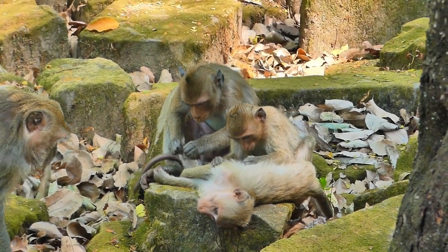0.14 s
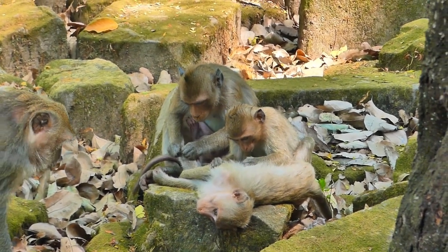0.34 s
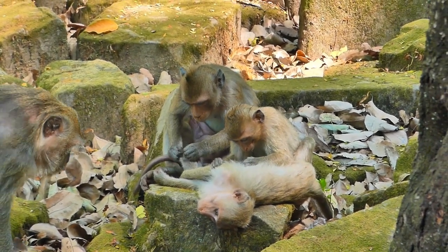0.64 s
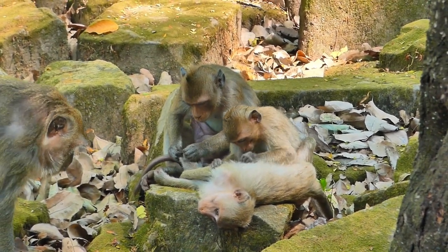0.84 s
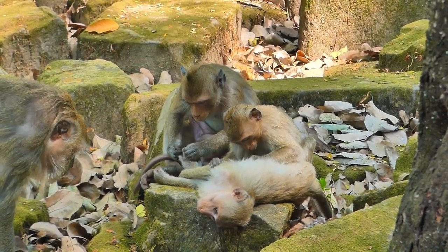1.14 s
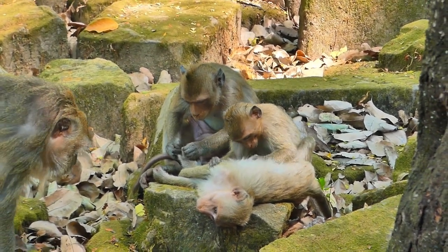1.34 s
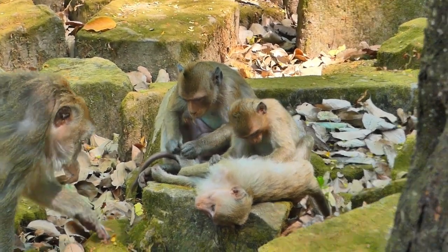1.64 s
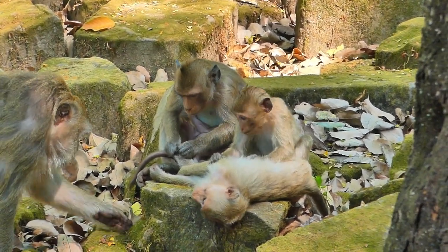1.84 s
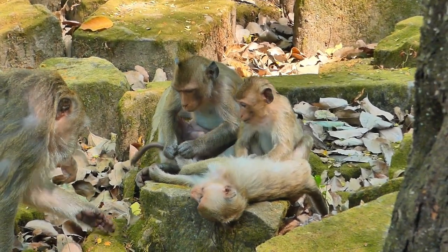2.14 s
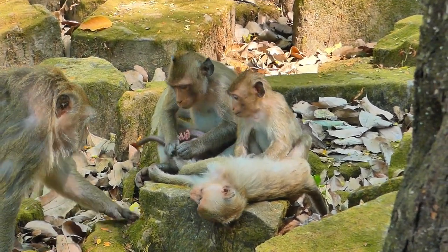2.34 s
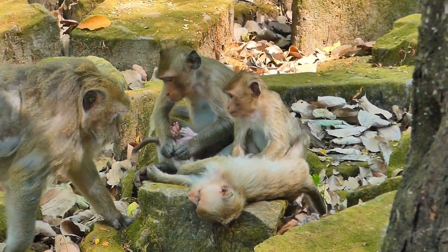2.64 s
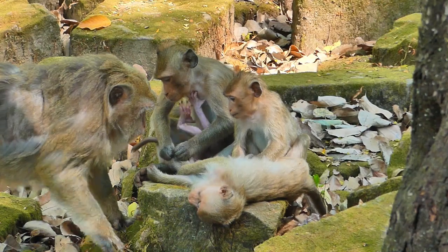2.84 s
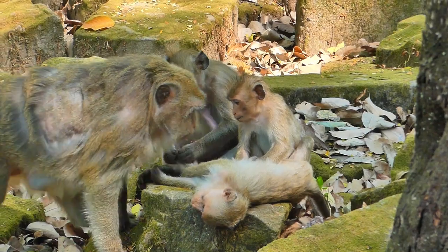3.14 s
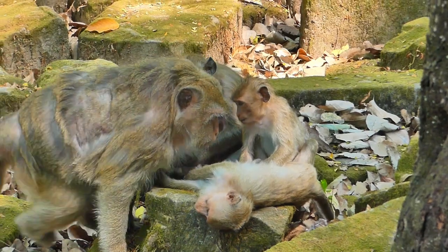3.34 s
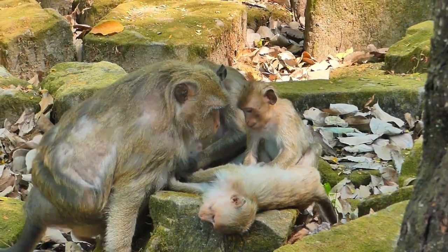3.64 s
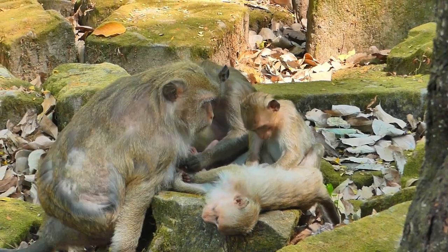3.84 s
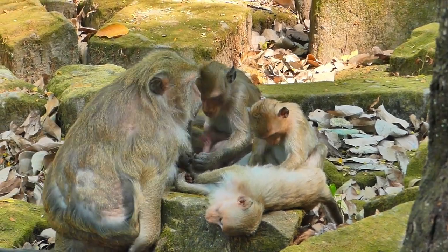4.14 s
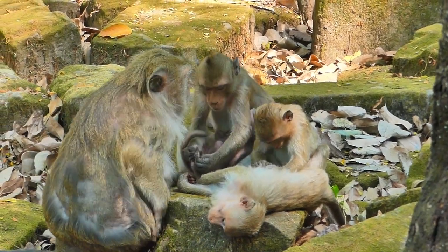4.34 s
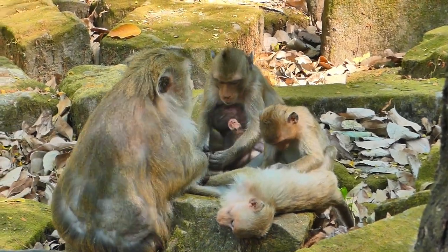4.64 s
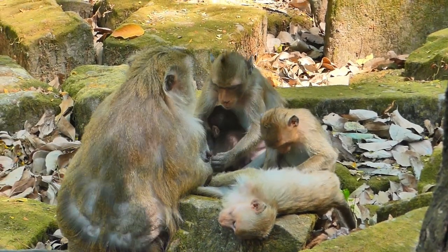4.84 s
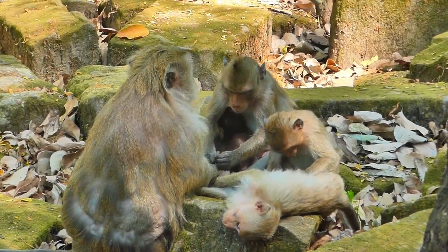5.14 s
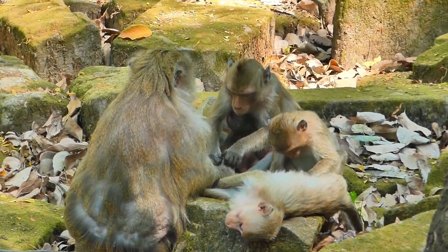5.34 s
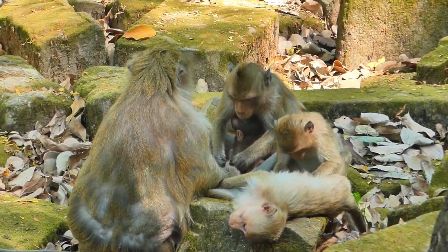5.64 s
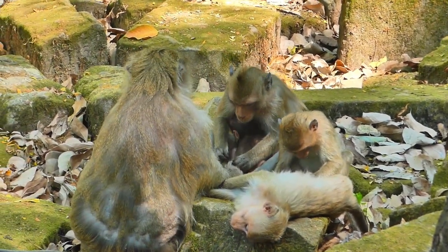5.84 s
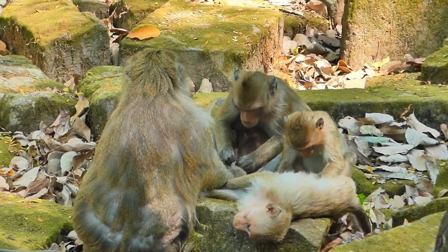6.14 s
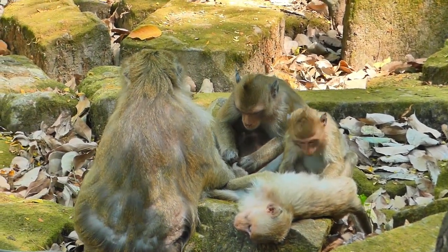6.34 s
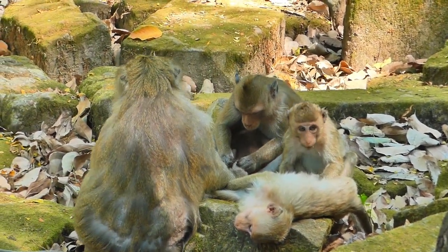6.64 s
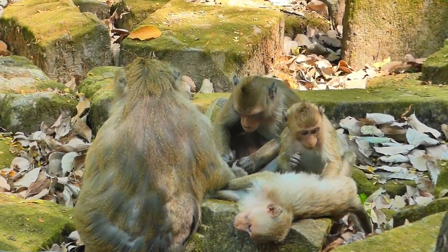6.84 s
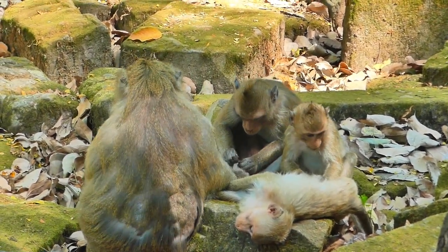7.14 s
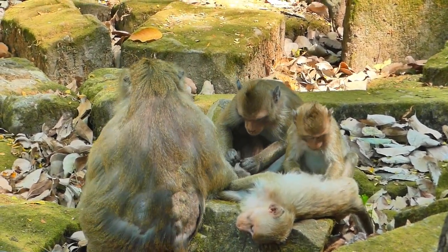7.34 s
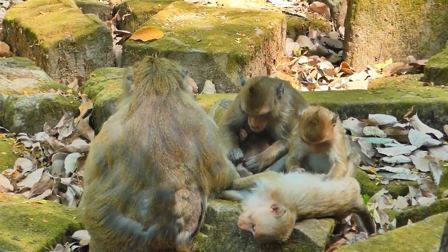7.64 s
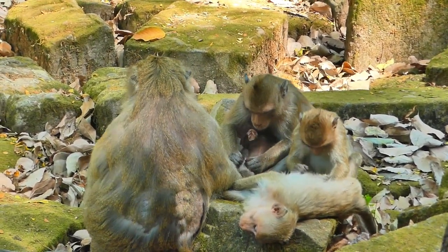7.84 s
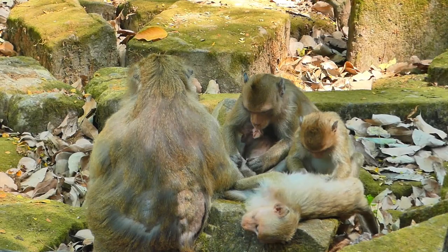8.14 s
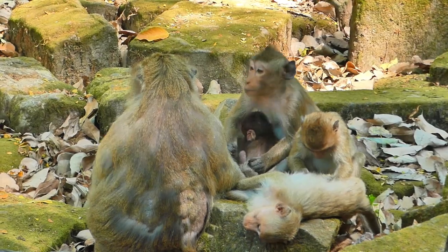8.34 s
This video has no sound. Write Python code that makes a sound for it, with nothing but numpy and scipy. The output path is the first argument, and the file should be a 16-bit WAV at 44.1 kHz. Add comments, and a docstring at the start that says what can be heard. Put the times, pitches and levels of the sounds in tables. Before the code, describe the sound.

A young macaque gives two clear, arched coos, then strained high squeals and rasping shrieks, with faint taps and dry leaf rustles in a quiet forest.

```python
"""Stone ruins in a forest: a baby macaque gives two clear, arched coos, then short yelps, squeals and rasping shrieks.
Coos and yelps are near-pure harmonics shaped by the mouth; a squeal is a high, unsteady whistle that frays into noise,
over a throat rasp and a hiss at the teeth. Hands and feet tap and thump as damped rings; dry leaves crack and scrape.
Thin gliding whistles sound far off, scattered noise echoes return from trunks and walls, and shaped noise is the air."""
import sys
import numpy as np
from scipy import signal
from scipy.fft import rfft, irfft, next_fast_len
from scipy.io import wavfile

SR = 44100
rng = np.random.default_rng(int(sys.argv[2]) if len(sys.argv) > 2 else 0)


def generate_wav(signal):
    """Clip the signal to [-1, 1] and save it as 16-bit WAV at the path in sys.argv[1]."""
    frames = np.transpose(np.atleast_2d(signal))
    scaled = np.clip(frames, -1, 1) * 32767
    pcm = np.round(scaled).astype(np.int16)
    wavfile.write(sys.argv[1], SR, pcm)


N = 374850  # samples

# Pitch and level arches of the coos, a list per coo.
# Each row: time in seconds, pitch in Hz, fundamental level in dB, second harmonic level in dB.
COO_CONTOURS = [
    [(0.893, 1470, -46, -74), (0.911, 1410, -41.5, -61), (0.935, 1540, -34, -74), (1.005, 1712, -35.5, -70),
     (1.127, 1845, -50, -54.5), (1.227, 1848, -42.5, -40.5), (1.293, 1778, -35, -40),
     (1.325, 1653, -30.5, -55.5), (1.35, 1490, -38, -71)],
    [(1.535, 1368, -47, -57), (1.555, 1471, -43.5, -55), (1.577, 1540, -32, -58.5),
     (1.651, 1653, -29, -62.5), (1.705, 1770, -34.5, -40.5), (1.799, 1815, -40, -40),
     (1.831, 1732, -34, -41.5), (1.863, 1637, -33, -55.5), (1.875, 1640, -52, -66)],
]
# High overtones against the second harmonic. Each entry: level of one coo in dB.
COO_BRIGHT_DB = [-6.5, -4]


def coo(contour, bright_db):
    """One clear arch: the fundamental thins and flutters where the mouth opens and the second harmonic swells."""
    start_s, end_s = contour[0][0], contour[-1][0]
    t = start_s + seconds(end_s - start_s)
    hz, first_db, second_db = follow(contour, t)
    waver = noise(len(t), 31, 31, order=4)
    mouth = amp((second_db - second_db.max()) / 2)
    wavering_hz = hz * (1 + .006 * mouth * waver)
    thinned_db = first_db - 2 * mouth * waver
    return start_s, voice(wavering_hz, thinned_db, second_db, bright_db, jitter=.003, shimmer=.035)


# Response of the mouth to overtones, read against the second harmonic. Each row: frequency in Hz, gain in dB.
MOUTH_RESPONSE = [(3150, -7.5), (3570, 2), (4400, -14), (5300, -21), (7200, -29.5), (10500, -18),
                  (14500, -31)]


def voice(hz, first_db, second_db, bright_db, jitter, shimmer):
    """A near-pure voice whose overtones pass the mouth."""
    n = len(hz)
    phase = phase_of(hz * (1 + jitter * noise(n, 0, 160)))
    overtones = np.zeros(n)
    for k in range(2, 9):
        level_db = read(MOUTH_RESPONSE, k * hz) - read(MOUTH_RESPONSE, 2 * hz)
        if k > 2:
            level_db = level_db + bright_db + 3.2 * noise(n, 18, 50, order=4)
        level_db = level_db + 2 * noise(n, 0, 130)
        overtones += amp(level_db) * np.sin(k * phase)
    tone = amp(first_db) * np.sin(phase) + amp(second_db) * overtones
    edges = signal.windows.tukey(n, .05)
    return np.sqrt(2) * edges * tone * (1 + shimmer * noise(n, 0, 330))


# Contours of the squeal whistles, a list per squeal. Each row: time in seconds, centre pitch in Hz, mean level in dB.
SQUEAL_CONTOURS = [
    [(4.247, 9740, -27), (4.266, 10550, -39.5), (4.311, 11320, -43.5), (4.332, 12300, -56),
     (4.494, 11770, -40.5), (4.515, 10660, -34.5), (4.558, 11160, -58), (4.608, 10830, -37),
     (4.632, 11800, -51), (4.652, 10860, -41.5), (4.725, 11460, -53), (4.745, 11580, -33.5),
     (4.777, 11240, -48), (4.812, 10110, -38.5), (4.855, 11420, -49), (4.91, 11520, -49.5),
     (4.926, 10500, -39), (4.947, 10420, -43)],
    [(5.237, 8220, -47), (5.255, 9500, -39), (5.323, 12460, -46), (5.355, 11390, -43.5),
     (5.437, 12150, -42), (5.475, 12250, -29.5), (5.496, 11220, -39), (5.515, 12430, -38),
     (5.54, 9500, -28.5), (5.553, 11150, -27.5), (5.603, 9780, -31), (5.668, 10210, -30),
     (5.693, 9300, -45), (5.722, 5830, -39.5)],
    [(5.982, 3607, -38.5), (6.004, 4000, -37.5), (6.024, 4600, -69), (6.034, 5746, -42.5),
     (6.066, 5986, -44), (6.112, 5650, -52), (6.15, 6175, -45), (6.175, 4196, -51), (6.205, 3684, -48)],
    [(6.41, 3595, -40), (6.423, 4154, -39), (6.46, 5520, -43), (6.477, 7380, -54), (6.506, 8900, -49),
     (6.585, 9470, -47.5), (6.625, 8670, -44)],
    [(6.852, 3150, -56.5), (6.871, 4180, -48.5)],
    [(6.924, 7550, -55), (6.975, 8400, -48.5), (7.0, 9420, -45), (7.066, 10560, -47), (7.142, 10600, -47.5),
     (7.164, 10040, -43), (7.237, 9880, -45), (7.248, 6710, -49.5), (7.266, 6030, -45.5)],
    [(7.465, 2400, -60), (7.487, 3430, -46.5), (7.508, 4415, -64), (7.527, 5880, -43), (7.56, 6200, -50.5),
     (7.575, 8880, -45.5), (7.612, 8100, -49), (7.645, 10160, -41.5), (7.664, 9400, -29.5)],
    [(7.688, 10010, -23.5), (7.708, 10490, -39.5), (7.742, 10020, -25.5), (7.762, 10120, -41),
     (7.787, 10700, -33), (7.806, 9670, -42), (7.826, 10100, -31.5), (7.86, 10240, -45), (7.876, 8740, -33),
     (7.91, 7980, -46), (7.932, 5890, -41.5)],
    [(8.19, 9980, -45), (8.226, 10630, -37), (8.283, 10370, -46.5), (8.355, 10740, -42),
     (8.377, 10540, -36), (8.43, 10890, -33.5), (8.475, 10180, -39), (8.52, 10720, -34)],
]
# Strain, a list per squeal. Each row: time in seconds, roughness before its fits (held to 0-1),
# throat rasp level in dB, hiss level in dB.
SQUEAL_STRAIN = [
    [(4.247, 0, -71, -52), (4.42, .03, -64, -59), (4.46, .1, -56, -57), (4.76, 0.13, -60.5, -49.5),
     (4.8, 0, -69, -56), (4.947, 0.3, -60, -52)],
    [(5.237, 0.1, -68, -58), (5.36, 0.4, -59.5, -52), (5.42, 0.78, -57.5, -42), (5.47, .05, -72, -54),
     (5.535, 0.66, -51, -50), (5.56, 0.1, -60, -56), (5.605, 0.12, -61, -54), (5.655, .03, -65, -47),
     (5.722, .8, -49, -48)],
    [(5.982, 0.13, -51, -39), (6.022, 0.17, -55.5, -56), (6.06, 0.2, -52.5, -41), (6.115, 0.4, -54, -53),
     (6.16, 0.46, -43, -49.5), (6.205, 1.1, -46, -57)],
    [(6.42, 0.15, -42.5, -42), (6.455, 0.33, -45, -49), (6.5, 0.5, -56, -51), (6.6, 1.1, -49, -47.5)],
    [(6.852, .4, -58.5, -69)],
    [(6.924, 0.2, -65.5, -64), (7.1, 0.24, -61, -53), (7.266, 0.9, -56.5, -58)],
    [(7.465, .3, -56, -67), (7.55, 0.3, -54.5, -50), (7.59, .02, -62.5, -68), (7.665, .1, -60, -41)],
    [(7.688, .03, -57.5, -43), (7.77, 0.02, -57, -47.5), (7.932, 0.34, -60, -54)],
    [(8.19, 0.56, -48, -35), (8.27, 0, -54, -50), (8.44, 0.05, -53, -41.5)],
]
# Two throat resonances. Each row, one per squeal: lower in Hz, upper in Hz, lower against upper in dB.
THROAT_RESONANCES = [(3200, 6120, -10.5), (4050, 6360, -2.5), (4200, 5500, -4), (4970, 6000, -10),
                     (3400, 4000, 0), (3900, 6900, -5), (3300, 6000, -6), (3280, 5860, -7.5),
                     (3200, 5570, -13)]
# Spectrum of the hiss at the teeth. Each row: frequency in Hz, gain in dB.
TEETH_SPECTRUM = [(7000, -54), (8300, -17), (10000, -7), (12800, -3), (15800, -7)]
LOWER_WIDTH_HZ, UPPER_WIDTH_HZ = 1800, 1900
WARBLE_HZ, WARBLE_PER_S, QUAVER_HZ = 79.1, 27, 80.8  # rms pitch swings, warble centre rate
CRACK_DB, SPUTTER_DB = 3, 0.7  # rms swings of roughness and of harsh level
RASP_ATTACK_S, RASP_RELEASE_S = .03, .015


def squeal(contour, strain, throat):
    """A high, unsteady whistle that frays in fits, over a rasp in the throat and a hiss at the teeth."""
    start_s, end_s = contour[0][0], contour[-1][0]
    t = start_s + seconds(end_s - start_s)
    n = len(t)
    hz, db = follow(contour, t)
    rough, rasp_db, hiss_db = follow(strain, t)
    lower_hz, upper_hz, lower_db = throat
    warble, shake_db, crack, sputter = [noise(n, WARBLE_PER_S, 40, order=4) for _ in range(4)]
    rough = np.clip(rough * amp(CRACK_DB * crack), 0, 1)
    hz = hz + WARBLE_HZ * warble
    phase = phase_of(hz + QUAVER_HZ * noise(n, 0, 300, order=4))

    # The drive builds up after the whistle starts and fades before it stops.
    edges = np.minimum((t - start_s) / RASP_ATTACK_S, (end_s - t) / RASP_RELEASE_S)
    drive = rattle(hz, phase, rough) * np.clip(edges, 0, 1)
    upper = resonate(drive, upper_hz, UPPER_WIDTH_HZ)
    lower = resonate(drive, lower_hz, LOWER_WIDTH_HZ)
    rasp = unit(upper + amp(lower_db) * lower)
    hiss = coloured(drive, TEETH_SPECTRUM)
    harsh = amp(SPUTTER_DB * sputter) * (amp(rasp_db) * rasp + amp(hiss_db) * hiss)
    tone = amp(db + shake_db) * whistle(phase, rough)
    return start_s, gate(n) * (tone + undertones(t, phase) + harsh)


FRAY_HZ = 1710  # width of the noise around a rough whistle
FLUTTER_DB = 3  # rms


def whistle(phase, rough):
    """Roughness turns a share of the tone into noise around its pitch; the folds limit its swing."""
    n = len(phase)
    clear = unit(amp(FLUTTER_DB * noise(n, 0, 700, order=4)))
    frayed = unit(noise(n, 0, FRAY_HZ, order=3) + 1j * noise(n, 0, FRAY_HZ, order=3))
    swing = np.sqrt(1 - rough) * clear + np.sqrt(rough) * frayed
    limited = swing / np.sqrt(1 + abs(swing) ** 2)
    return unit((limited * np.exp(1j * phase)).imag)


# Clear tones below a whistle. Each row: start in seconds, length in seconds, share of the whistle pitch, level in dB.
UNDERTONE_SPELLS = [(4.81, 0.044, 0.49, -54), (5.593, 0.15, .71, -49.5), (6.035, 0.2, 0.8, -55),
                    (7.72, 0.13, 0.845, -50), (8.233, 0.077, 0.51, -48)]


def undertones(t, phase):
    """For short spells the folds lock, and a clear tone below the whistle follows its pitch."""
    flutter = unit(amp(5 * noise(len(t), 0, 400, order=4)))
    tones = np.zeros(len(t))
    for start_s, length_s, share, db in UNDERTONE_SPELLS:
        position = 2 * (t - start_s) / length_s - 1  # -1 to 1 within the spell
        swell = np.sqrt(2 * np.maximum(1 - position ** 2, 0))
        tones += amp(db) * swell * np.sin(share * phase)
    return flutter * tones


FLAP_LOW_HZ, FLAP_HIGH_HZ = 1400, 3000  # sought flapping rates; the low one also floors the side tones
LOCK_S = .025  # mean hold of one sought rate


def rattle(hz, phase, rough):
    """The flapping folds spread wobbling side tones around the whistle; turbulent air joins them."""
    n, flap_hz = len(hz), flapping(hz)
    flap_phase = phase_of(flap_hz)
    tones = np.zeros(n)
    for k in np.r_[-5:0, 1:8]:
        wobble = (.85 + .9 * rough) * noise(n, 0, 850, order=4)
        side_hz = hz + k * flap_hz
        audible = (side_hz > FLAP_LOW_HZ) * (side_hz < SR / 2)
        tones += audible * np.sin(phase + k * flap_phase + wobble) * amp(4.5 * noise(n, 0, 110, order=4))
    return unit(tones) + (.5 + .7 * rough) * rng.standard_normal(n)


def flapping(hz):
    """The folds lock to a half, a third, a quarter... of the pitch, with sudden jumps."""
    spell = np.cumsum(rng.random(len(hz)) < 1 / (LOCK_S * SR))
    spell_start = np.searchsorted(spell, spell)
    wanted_hz = rng.uniform(FLAP_LOW_HZ, FLAP_HIGH_HZ, len(hz))[spell_start]
    return hz / np.maximum(np.round(hz / wanted_hz), 2)


# Short rising yelps. Each row: start in seconds, length in seconds, first pitch in Hz, last pitch in Hz,
# fundamental mid level in dB, second harmonic mid level in dB.
YELP_GLIDES = [(5.955, .027, 1720, 2255, -56.5, -53.5), (6.384, 0.023, 1900, 2433, -51.5, -57),
               (6.829, .028, 1860, 2345, -60, -59.5)]


def yelp(start_s, length_s, first_hz, last_hz, first_db, second_db, swell_db=6):
    """A short upward glide of the coo's voice, growing louder."""
    u = seconds(length_s) / length_s
    hz = first_hz + (last_hz - first_hz) * u
    swell = swell_db * (u - .5)
    return start_s, voice(hz, first_db + swell, second_db + swell, bright_db=-10, jitter=.04, shimmer=.4)


# Soft contacts of hands and feet on stone. Each row: start in seconds, relative level in dB, ring in Hz.
STONE_THUMPS = [(1.312, -40.5, 766), (1.388, -40.5, 635), (1.408, -46, 560)]
THUMP_T60_S, THUMP_LOW_HZ = 0.047, 238


def thump(start_s, db, hz):
    """A soft, heavy contact on stone: a few dying cycles over a low push."""
    t = seconds(THUMP_T60_S)
    ring = np.sin(2 * np.pi * hz * t)
    push = .5 * np.sin(2 * np.pi * THUMP_LOW_HZ * t)
    body = ring + push + 0.61 * noise(len(t), hz, hz)
    return start_s, amp(db - 60 * t / THUMP_T60_S) * gate(len(t)) * body


# Taps on stone and snaps of leaves. Each row: start in seconds, relative level in dB, ring in Hz, T60 in seconds.
STONE_TAPS = [(1.397, -35.5, 4000, 0.0057), (1.92, -39, 931, 0.016), (2.787, -47.5, 725, 0.058),
              (3.077, -49, 2850, 0.053), (3.382, -48, 855, 0.052), (3.93, -44.5, 2400, 0.069),
              (4.127, -49.5, 4640, 0.15), (4.153, -49, 5900, 0.069), (6.199, -44.5, 930, 0.03),
              (7.97, -35.5, 880, 0.028), (8.233, -37.5, 686, 0.055)]


def tap(start_s, db, hz, t60_s):
    """A short, damped knock; the leaves under it crackle as they give way."""
    t = np.arange(SR // 6) / SR
    attack = 1 - np.exp(-t / 0.00044)
    body = noise(len(t), hz, .8 * hz, order=4) * attack * amp(-60 * t / t60_s)
    cracks = rng.standard_normal(len(t)) * (.3 + (rng.random(len(t)) < 2000 / SR))
    crackle = coloured(cracks, [(400, -10), (2000, 0), (7000, -9), (12000, -24)])  # (Hz, dB)
    crackle = crackle * amp(-60 * (t / t60_s) ** 1.5)
    return start_s, amp(db - 1) * (body + 0.34 * crackle)


# Pushes of a body through leaves. Each row: peak time in seconds, relative peak level in dB,
# swell in seconds, fade in seconds.
LEAF_SHUFFLES = [(5.73, -58, 0.81, 0.84), (6.19, -61, 0.55, 1), (7.925, -41, 0.087, 0.12),
                 (7.973, -46, 0.03, 0.041), (8.058, -39, 0.044, 0.091), (8.135, -43.5, 0.054, 0.13),
                 (8.235, -44.5, 0.21, 0.12), (8.48, -51, 0.48, 0.62)]
# Light brushes over leaves. Each row: peak time in seconds, relative peak level in dB,
# swell in seconds, fade in seconds.
LEAF_BRUSHES = [(0.961, -46, 0.052, 0.071), (1.25, -54.5, 0.94, 0.17), (7.5, -58.5, .8, 0.38)]
# Spectrum of the pushed leaves. Each row: frequency in Hz, gain in dB.
LEAF_SPECTRUM = [(40, -33), (120, -14.5), (580, 3), (2300, 0), (3700, -4), (6000, -2), (15000, -15)]
STIR_RANGE_DB = 20  # rise over the swell, drop over the fade


def rustle(peak_s, peak_db, swell_s, fade_s, spectrum, cracks_per_s, spread_db):
    """Dry leaves: a dense run of tiny cracks of uneven size over a soft scrape, swelling and fading."""
    t = seconds(swell_s + fade_s) - swell_s
    n = len(t)
    db = peak_db - STIR_RANGE_DB * np.maximum(-t / swell_s, t / fade_s)
    crack_size = amp(spread_db * np.minimum(rng.exponential(1, n), 3))
    cracks = (rng.random(n) < cracks_per_s / SR) * rng.standard_normal(n) * crack_size
    scrape = 0.86 * rng.standard_normal(n)
    return peak_s - swell_s, gate(n) * amp(db) * coloured(unit(cracks) + scrape, spectrum)


# Distant whistles. Each row: start in seconds, length in seconds, first pitch in Hz, last pitch in Hz,
# relative level in dB.
FAR_WHISTLES = [(0.281, .2, 3540, 5920, -62.5), (0.654, 0.11, 12700, 12100, -60),
                (3.199, 0.17, 6300, 5220, -69.5), (3.851, 0.18, 5100, 5730, -64.5)]
WHISTLE_PEAK = 0.89  # share of the length


def far_whistle(start_s, length_s, first_hz, last_hz, db):
    """A thin gliding whistle, blurred by distance."""
    u = seconds(length_s) / length_s
    hz = first_hz + (last_hz - first_hz) * u
    swell = np.interp(u, [0, WHISTLE_PEAK, 1], [0, 1, 0])
    blurred = unit(np.sin(phase_of(hz)) * noise(len(hz), 0, 520))
    return start_s, swell * amp(db) * blurred


# Echo decay. Each row: frequency in Hz, T60 in seconds.
ECHO_T60_S = [(1500, 0.86), (7000, 0.78), (14000, 0.35)]
# Echo spectrum; foliage soaks up the highest notes. Each row: frequency in Hz, gain in dB.
ECHO_SPECTRUM = [(1700, -4.5), (6000, -3.5), (10000, -5)]


def forest(x, apart):
    """Scattered echoes from trunks and walls, the treble dying first."""
    reflections = rng.standard_normal((2, SR)) * (rng.random((2, SR)) < .1)
    hz, t, z = signal.stft(reflections, SR, nperseg=256)
    decay_db = 60 * t / read(ECHO_T60_S, hz)[:, None]
    fade = amp(read(ECHO_SPECTRUM, hz)[:, None] - decay_db) * np.minimum(t / 0.0013, 1)
    mid, side = signal.istft(z * fade, SR, nperseg=256)[1]
    tail = np.array([mid + apart * side, mid - apart * side]) / np.linalg.norm(mid)
    return signal.fftconvolve(x[None], tail, axes=1)[:, :N]


# Spectrum of the air. Each row: frequency in Hz, gain in dB.
AIR_SPECTRUM = [(25, -40), (55, -16.5), (110, 0), (420, 3), (1570, -1.5), (2560, -11.5), (4870, -14),
                (6210, -10.5), (7700, -19.5), (10100, -12.5), (15500, -19)]
# Stereo likeness of the air. Each row: frequency in Hz, left-right correlation from -1 to 1.
AIR_LIKENESS = [(150, -0.31), (450, -0.32), (900, 0.54)]
# Stereo lean of the air. Each row: frequency in Hz, left over right in dB.
AIR_LEAN = [(70, -8.5), (300, 7.5), (2000, 0.5)]
AIR_DB = -62


def air():
    """The soft wash of the forest: noise wide in the bass, central in the treble, its level wandering slightly."""
    hz = np.fft.rfftfreq(N, 1 / SR)
    a, b = rfft(rng.standard_normal((2, N)))
    same = np.clip(read(AIR_LIKENESS, hz), -1, 1)
    lean_db = read(AIR_LEAN, hz) / 2
    left = a * amp(lean_db)
    right = (same * a + np.sqrt(1 - same ** 2) * b) * amp(-lean_db)
    wash = irfft(np.array([left, right]) * amp(read(AIR_SPECTRUM, hz)), N)
    return unit(wash) * amp(AIR_DB + 0.63 * noise(N, 0, 33))


def amp(db):
    """Decibels to gain."""
    return 10 ** (np.asarray(db) / 20)


def unit(x):
    """Scales to rms 1."""
    return x / np.sqrt(np.mean(abs(x) ** 2) + 1e-20)


def read(points, hz):
    """Reads a table on a log-frequency axis."""
    f, value = np.transpose(points)
    return np.interp(np.log(hz + 1), np.log(f + 1), value)


def follow(table, t):
    """Each column of a (s, ...) table at the times t."""
    when, *columns = np.transpose(table)
    return [np.interp(t, when, column) for column in columns]


def seconds(length_s):
    """Sample times of a sound of this length."""
    return np.arange(0, length_s, 1 / SR)


def phase_of(hz):
    """Running phase of a pitch curve."""
    return 2 * np.pi * np.cumsum(hz) / SR


def gate(size):
    """Soft edges of 3 ms."""
    return signal.windows.tukey(size, .006 * SR / size)


def noise(size, hz, width_hz, order=2):
    """Noise in a resonance, cut from a stretch of rms 1; around 0 Hz it is a slow wander."""
    return resonate(rng.standard_normal(size + 4096), hz, width_hz, order)[:size]


def resonate(x, hz, width_hz, order=2):
    """Passes a sound through one resonance, to rms 1."""
    length = next_fast_len(len(x))
    f = np.fft.rfftfreq(length, 1 / SR)
    response = (1 + (2 * (f - hz) / width_hz) ** 2) ** (-order / 2)
    return unit(irfft(rfft(x, length) * response, length)[:len(x)])


def coloured(x, spectrum):
    """Filters by a (Hz, dB) table, to rms 1."""
    length = next_fast_len(len(x) + 512)
    gain = amp(read(spectrum, np.fft.rfftfreq(length, 1 / SR)))
    return unit(irfft(rfft(x, length) * gain, length)[:len(x)])


def add(mix, start_s, sound):
    """Adds a sound into the mix at start_s."""
    part = mix[max(round(start_s * SR), 0):][:len(sound)]
    part += sound[:len(part)]


def scene():
    """The baby's calls in the middle, small movements just left of it, all in the forest."""
    coos, cries, ground, far = np.zeros((4, N))
    for call in zip(COO_CONTOURS, COO_BRIGHT_DB):
        add(coos, *coo(*call))
    for call in zip(SQUEAL_CONTOURS, SQUEAL_STRAIN, THROAT_RESONANCES):
        add(cries, *squeal(*call))
    for row in YELP_GLIDES:
        add(cries, *yelp(*row))
    for row in STONE_THUMPS:
        add(ground, *thump(*row))
    for row in STONE_TAPS:
        add(ground, *tap(*row))
    for row in LEAF_SHUFFLES:
        add(ground, *rustle(*row, LEAF_SPECTRUM, cracks_per_s=2500, spread_db=1.5))
    brush_spectrum = [(100, -16), (6000, 0), (15000, -8)]  # (Hz, dB)
    for row in LEAF_BRUSHES:
        add(ground, *rustle(*row, brush_spectrum, cracks_per_s=4000, spread_db=3.5))
    for row in FAR_WHISTLES:
        add(far, *far_whistle(*row))
    direct = coos + cries + ground * amp([[.7], [-.7]]) + amp(-1.0) * far
    sent = amp(-23.0) * coos + amp(-10.0) * cries + amp(-10.5) * ground + amp(-6) * far
    return direct + forest(sent, apart=0.66) + air()


LOW_CUT_HZ, EDGE_HZ = 42, 15800


def record(dry):
    """The recorder's low cut and band limit."""
    low_cut = signal.butter(2, LOW_CUT_HZ, "highpass", fs=SR, output="sos")
    band_limit = signal.firwin(511, EDGE_HZ, window=("kaiser", 9), fs=SR)
    return signal.oaconvolve(signal.sosfilt(low_cut, dry), band_limit[None], "same")


dry = scene()
out = record(dry)
generate_wav(out)
```